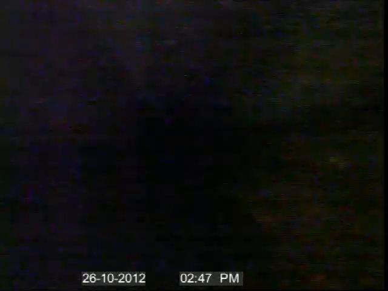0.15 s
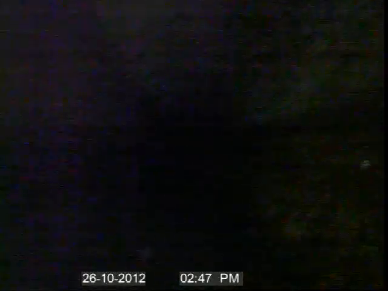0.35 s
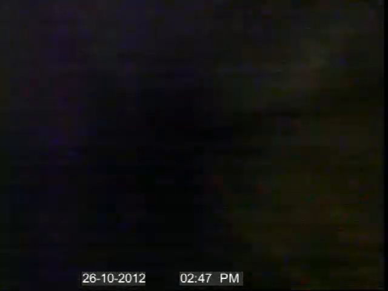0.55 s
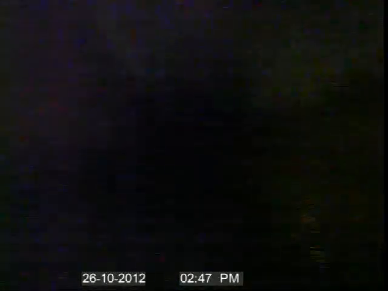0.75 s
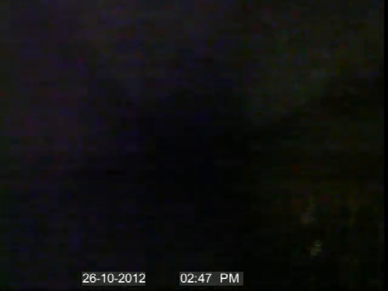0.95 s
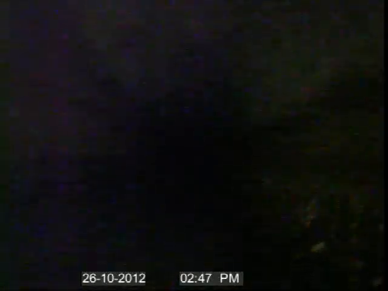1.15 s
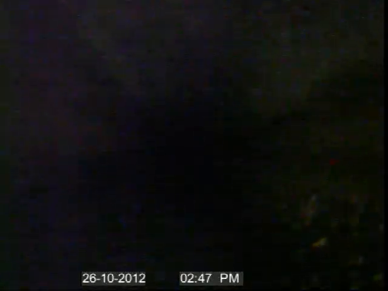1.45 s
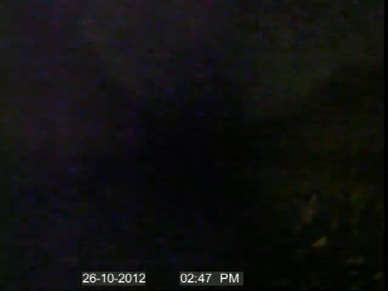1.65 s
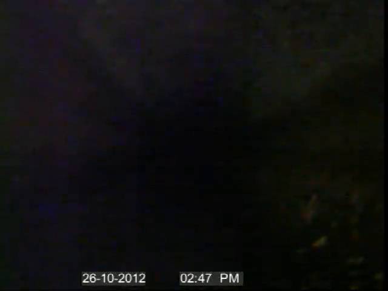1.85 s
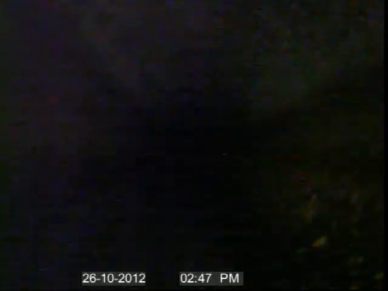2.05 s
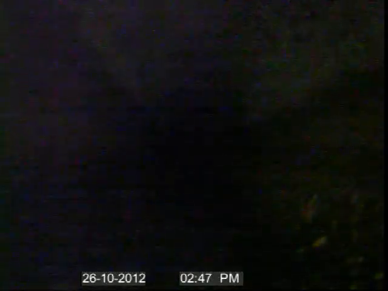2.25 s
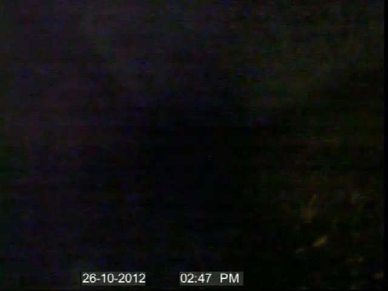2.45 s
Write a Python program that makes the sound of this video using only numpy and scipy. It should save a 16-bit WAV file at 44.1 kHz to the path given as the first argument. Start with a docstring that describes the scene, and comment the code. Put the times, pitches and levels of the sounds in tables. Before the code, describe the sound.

Juddering scrape of an inspection camera pushed along a drain, settling before two metallic clacks.

```python
"""Inside a drain pipe: an inspection camera is pushed along, then coasts to rest. Stick-slip makes its
cable judder and scrape, friction adds a rasp, and the peaks overload the microphone. The camera head
knocks and bumps with a short ring. A faint wavering drone stays, with hum, whine and light rubbing.
The cable shifts in small scuffs, and a metal part is struck twice: a crack, a thud, ringing modes."""
import sys
import numpy as np
from scipy import signal
from scipy.fft import rfft, irfft
from scipy.io import wavfile

SR = 44100
rng = np.random.default_rng(int(sys.argv[2]) if len(sys.argv) > 2 else 0)


def persist_wave(psi):
    """Save psi, clipped to +-1, as 16-bit WAV."""
    counts = np.round(np.clip(psi, -1, 1) * 32767).astype(np.int16)
    wavfile.write(sys.argv[1], SR, np.atleast_2d(counts).T)


N = 114660

# High resonances excited by rubbing: centre_hz, width_hz, pushed_db, rest_db
RUB_RESONANCES = [(1607, 73, -8, -64), (2937, 180, -4.5, -75), (3974, 230, -0.5, -78.5),
                  (4680, 190, -10, -80)]
# Low noise band of the scuffs and hum: freq_hz, gain_db
LOW_BAND = [(60, -17), (200, 9), (450, 4.5), (700, -15), (1100, -15), (2000, -74)]


def amp(db):
    """Decibels to gain."""
    return 10 ** (np.asarray(db) / 20)


def unit(x):
    """Scale to rms 1."""
    return x / np.sqrt(np.mean(x ** 2) + 1e-20)


def add(mix, start_s, sound):
    """Mix a sound in at start_s."""
    part = mix[max(round(start_s * SR), 0):][:len(sound)]
    part += sound[:len(part)]


def colour(x, spectrum):
    """Filter by (freq_hz, gain_db) points; rms 1."""
    hz, db = np.transpose(spectrum)
    gain_db = np.interp(np.log(np.fft.rfftfreq(N, 1 / SR) + 1), np.log(hz), db)
    return unit(irfft(rfft(x) * amp(gain_db), N))


def noise(spectrum):
    """Coloured noise; rms 1."""
    return colour(rng.standard_normal(N), spectrum)


def drift(rate_hz):
    """Low-passed random motion; rms 1."""
    lowpass = np.exp(-(np.fft.rfftfreq(N, 1 / SR) / rate_hz) ** 2)
    return unit(irfft(rfft(rng.standard_normal(N)) * lowpass, N))


def resonate(x, hz, width_hz):
    """Two-pole resonance; rms 1."""
    r = np.exp(-np.pi * width_hz / SR)
    return unit(signal.lfilter([1, 0, -1], [1, -2 * r * np.cos(2 * np.pi * hz / SR), r * r], x))


def push_level_db(curve, stop_s=0.891, fall_db_per_s=100):
    """Per-sample level of a (time_s, level_db) curve, dying away as the cable stops."""
    t = np.arange(N) / SR
    return np.interp(t, *np.transpose(curve)) - fall_db_per_s * np.maximum(t - stop_s, 0)


def slips(rate_per_s=700, spread_db=2):
    """Stick-slip: small random jerks of uneven size."""
    size = amp(spread_db * np.minimum(rng.exponential(1, N), 3))
    return unit(size * rng.choice([-1, 1], N) * (rng.random(N) < rate_per_s / SR))


def friction_band(hz, width_hz, wander_hz=35.47):
    """Rubbed resonance: a noise band with a wandering centre."""
    phase = 2 * np.pi * np.cumsum(hz + wander_hz * drift(rate_hz=13.58)) / SR
    return drift(width_hz) * np.cos(phase) + drift(width_hz) * np.sin(phase)


def cable_judder(full_push_db=-14):
    """Slips shake cable and pipe: judder, ringing and midrange scrape over a low rumble."""
    # Spectra of the pushed cable: freq_hz, gain_db
    body_spectrum = [(60, -11.5), (130, 3.5), (220, -2), (300, -4.5), (420, -2.5), (520, -19), (800, -58),
                     (1200, -54.5), (2400, -62)]
    rumble_spectrum = [(15, -17), (25, -20.5), (70, 6.5), (108, -7), (180, -22.5), (230, -53), (400, -120)]
    scrape_spectrum = [(350, -10.5), (520, -8), (680, 5.5), (820, 0), (1000, -3.5), (1250, -13.5),
                       (1650, -21), (2400, -21.5), (4000, -55)]
    # Envelopes of the push: time_s, level_db
    judder_curve = [(0.0, -22), (0.038, -14), (0.09, -22), (0.136, -16), (0.246, -19.5), (0.264, -15),
                    (0.42, -20), (0.456, -17), (0.506, -21.5), (0.528, -36), (0.556, -21.5), (0.67, -24.5),
                    (0.986, -43.5), (1.0, -47)]
    rumble_curve = [(0.0, -23), (0.044, -17), (0.076, -17), (0.15, -26.5), (0.246, -17.5), (0.278, -27),
                    (0.31, -17), (0.362, -26.5), (0.42, -13.5), (0.458, -20.5), (0.484, -25), (0.506, -24),
                    (0.59, -19.5), (0.688, -24), (0.704, -23.5), (1.0, -40.5)]
    scrape_curve = [(0, -42), (.12, -43.5), (.3, -37), (.4, -39.5), (.52, -39.5), (.58, -46), (.7, -47.5),
                    (.8, -50), (.9, -51), (.97, -58)]
    # Cable resonances in the pipe: centre_hz, width_hz, max_level_db, slope_db_per_judder_db
    cable_modes = [(206, 17, -18, 3), (256.5, 8.5, -17.5, 1.02), (392.5, 40, -26, 0.8)]
    jerks = slips()
    body = colour(jerks, body_spectrum)
    judder_db = push_level_db(judder_curve)
    judder = amp(judder_db - 4.5) * body
    boom = amp(-4.5) * resonate(body, hz=74.7, width_hz=7.9)
    rumble = amp(push_level_db(rumble_curve)) * (amp(1) * noise(rumble_spectrum) + boom)
    easing_db = np.minimum(judder_db - full_push_db, 0)
    ring = sum(amp(db + slope * easing_db) * resonate(body, hz, width_hz)
               for hz, width_hz, db, slope in cable_modes)
    scrape = amp(push_level_db(scrape_curve)) * colour(jerks, scrape_spectrum)
    return rumble + judder + ring + scrape


def cable_rasp(flicker_db=2.15):
    """Friction of the moving cable: flickering bright noise and rubbed resonances."""
    # Friction noise: freq_hz, gain_db
    rasp_spectrum = [(600, -10), (1600, 1), (2300, -4), (3000, -8), (3500, -5), (4100, -1), (5000, -8.5),
                     (7000, -13.5), (11000, -22)]
    # Rasp envelope: time_s, level_db
    rasp_curve = [(0, -54.5), (.1, -51.5), (.2, -48), (.4, -51), (.55, -55.5), (.7, -60.5), (.85, -75),
                  (1, -86)]
    grit = amp(1.5) * noise(rasp_spectrum)
    bands = sum(amp(db) * friction_band(hz, width_hz) for hz, width_hz, db, _ in RUB_RESONANCES)
    return amp(push_level_db(rasp_curve) + flicker_db * drift(rate_hz=37)) * (grit + bands)


def drone(waver_db=1.3):
    """Low gliding tone, wavering in pitch and level."""
    # Drone path: time_s, pitch_hz, level_db
    path = [(.85, 121.3, -50), (1.0, 121.7, -42), (1.241, 124.3, -38.5), (1.29, 112.1, -55),
            (1.501, 97.6, -48.5), (1.658, 98.5, -44.5), (1.79, 118.7, -43), (1.9, 101.5, -52),
            (2.15, 100.4, -46), (2.6, 105, -97)]
    t = np.arange(N) / SR
    time_s, hz, db = np.transpose(path)
    pitch_hz = np.interp(t, time_s, hz) * (1 + 0.0125 * drift(rate_hz=19.5))
    level_db = np.interp(t, time_s, db) + waver_db * drift(rate_hz=15)
    return np.sqrt(2) * amp(level_db) * np.sin(2 * np.pi * np.cumsum(pitch_hz) / SR)


def light_rubbing(fade_start_s=1.8, fall_db_per_s=20):
    """Faint friction on the high resonances, fading late."""
    t = np.arange(N) / SR
    bands = sum(amp(db) * friction_band(hz, width_hz) for hz, width_hz, _, db in RUB_RESONANCES)
    return bands * amp(-fall_db_per_s * np.maximum(t - fade_start_s, 0))


def background():
    """Steady whine, narrow-band noise hum, and a floor of rumble and hiss."""
    # Whine partials and hum resonances: pitch_hz, level_db
    whine_partials = [(2046, -72), (3070, -74), (4093, -74.5)]
    hum_modes = [(260, -60), (311, -55), (352, -64.5)]
    # Noise floor: freq_hz, gain_db
    floor_spectrum = [(20, 0), (40, 2.5), (70, -1), (110, -7.5), (170, -17.5), (300, -27.5), (450, -26.5),
                      (700, -32), (1300, -35), (1900, -37.5), (3400, -41), (5000, -43.5), (9500, -40),
                      (11000, -47)]
    t = np.arange(N) / SR
    whine = np.sqrt(2) * sum(amp(db) * np.sin(2 * np.pi * hz * t) for hz, db in whine_partials)
    hum = sum(amp(db) * resonate(noise(LOW_BAND), hz, width_hz=7.9) for hz, db in hum_modes)
    floor = noise(floor_spectrum) * amp(-38 + 0.8 * drift(rate_hz=60))
    return whine + hum + floor


def head_blow(t, push_db, push_hz, ring_db, ring_rise_s=0.0046):
    """Dull push and rebound, with a short ring of the camera head."""
    # Camera head modes: freq_hz, gain_db, t60_s
    head_modes = [(265.8, -2.5, 0.48), (297.3, 2, 0.047), (349.5, 1.5, 0.15), (389, -23, 0.21)]
    cycles = push_hz * t
    push = -2 * np.sin(2 * np.pi * cycles) * np.exp(-1.6 * cycles) * (1 - np.exp(-4 * cycles))
    ring = sum(amp(db - 60 * t / t60_s) * np.sin(2 * np.pi * hz * t) for hz, db, t60_s in head_modes) / 2
    return amp(push_db) * push + amp(ring_db) * ring * np.minimum(t / ring_rise_s, 1)


def knocks(tick_t60_s=0.045):
    """The head hits the pipe wall: hard knocks add a tick, soft bumps do not."""
    # Hard knocks: start_s, push_db, push_hz, ring_db, tick_db
    hard_knocks = [(0.0256, -12, 746, -10, -31), (.131, -12, 500, -20, -48), (.300, -26, 612, -10, -42),
                   (1.524, -22.5, 388, -49, -50), (1.816, -25.5, 296, -39, -31),
                   (1.835, -20.5, 295, -34, -48)]
    # Soft bumps: start_s, push_db, push_hz, ring_db
    soft_bumps = [(1.855, -27.5, 385, -27), (1.928, -25, 49.5, -62), (2.0126, -9.5, 205, -26.5),
                  (2.022, -14, 75, -36), (2.035, -22.5, 68.3, -40)]
    # Contact tick: freq_hz, gain_db
    tick_spectrum = [(400, 0), (850, 2.5), (1200, 9), (1750, -7), (2200, -19), (4000, -22), (6000, -48)]
    out, t = np.zeros(N), np.arange(SR // 4) / SR
    for start_s, push_db, push_hz, ring_db, tick_db in hard_knocks:
        tick = noise(tick_spectrum)[:len(t)] * amp(tick_db - 60 * t / tick_t60_s)
        add(out, start_s, head_blow(t, push_db, push_hz, ring_db) + tick)
    for start_s, push_db, push_hz, ring_db in soft_bumps:
        add(out, start_s, head_blow(t, push_db, push_hz, ring_db))
    return out


def scuffs(grit_db=2.94):
    """The cable shifts: short gritty rubs that swell and fade."""
    # Cable scuffs: start_s, length_s, low_db, mid_db, high_db
    shifts = [(1.323, .03, -47, -58, -63.5), (1.422, 0.018, -47, -55, -49), (1.488, 0.033, -37, -52.5, -62),
              (1.645, 0.044, -38.5, -52.5, -59), (1.73, 0.021, -46, -56, -77),
              (1.816, 0.034, -44, -46, -50), (2.211, 0.0069, -66, -52, -53.5),
              (2.506, 0.039, -62, -61, -61), (2.540, 0.0067, -48, -48.5, -50)]
    # Upper scuff bands: freq_hz, gain_db
    mid_band = [(400, -18), (900, 8.5), (1400, -0.5), (2000, 12), (3000, 4.5), (5000, -60)]
    high_band = [(1500, -22), (3000, -3), (4100, 9.5), (5000, -4.5), (10000, 1.5), (12000, -12)]
    out = np.zeros(N)
    for start_s, length_s, *levels_db in shifts:
        progress = np.arange(0, 2, 1 / (SR * length_s))
        envelope = np.minimum(progress / 0.29, 1) * np.exp(-progress ** 4)
        rub = sum(amp(db) * noise(band) for db, band in zip(levels_db, (LOW_BAND, mid_band, high_band)))
        rub *= amp(grit_db * drift(rate_hz=134))
        add(out, start_s, rub[:len(envelope)] * envelope)
    return out


def treble_lift_db(hz, shelf_db, corner_hz=8700):
    """High-shelf gain at hz."""
    return shelf_db / (1 + (corner_hz / hz) ** 10)


def clacks(crack_t60_s=0.045, tail_t60_s=0.21, tail_db=-16.5, thud_hz=82, thud_t60_s=0.15):
    """Metal strikes metal: dense crack, thud and beating modes."""
    # Strikes: start_s, rise_s, ring_db, crack_db, shelf_db
    strikes = [(2.0618, .005, -28.5, -19.5, 10), (2.3922, .0008, -20.5, -11, 0)]
    # Modes of the metal part: freq_hz, gain_db, t60_s
    metal_modes = [(980, -10, .19), (1152, -1.5, .18), (1517, -3, .06), (1728, -11, .17), (1988, 1.5, .05),
                   (2304, -19, .2), (2782, -11, .16), (2893, -7, .13), (3537, -20, .22), (3860, -7, .095),
                   (4630, -5, .05), (5114, 2, .12), (5233, 6, .095), (5545, -3, .09), (6285, 2, .045),
                   (6526, -1.5, .095), (6855, -1, .08), (7690, -5, .08), (8123, -16, .15), (8990, -1, .065),
                   (9497, -5, .11), (9700, -7, .058), (10830, -15, .07)]
    # Impact noise: freq_hz, gain_db
    crack_spectrum = [(100, -4), (540, 3), (900, 2), (1200, 5), (2000, 6), (2500, -9), (4000, 2),
                      (5200, -5), (6500, 1.5), (8000, -2), (9500, 0), (11000, -10)]
    out, t = np.zeros(N), np.arange(SR // 3) / SR
    thud = np.sin(2 * np.pi * thud_hz * t) * amp(-27 - 60 * t / thud_t60_s)
    tail = amp(tail_db - 60 * t / tail_t60_s)
    for start_s, rise_s, ring_db, crack_db, shelf_db in strikes:
        ring = sum(amp(db + treble_lift_db(hz, shelf_db) - 60 * t / t60_s)
                   * np.sin(2 * np.pi * (hz * t + rng.random())) for hz, db, t60_s in metal_modes)
        lifted_spectrum = [(hz, db + treble_lift_db(hz, shelf_db)) for hz, db in crack_spectrum]
        burst = amp(-60 * np.maximum(t - rise_s, 0) / crack_t60_s)
        crack = noise(lifted_spectrum)[:len(t)] * (burst + tail)
        attack = np.minimum(t / rise_s, 1)
        add(out, start_s, attack * (amp(ring_db) * ring + amp(crack_db) * crack + thud))
    return out


def scene():
    """All sources at one microphone."""
    push = cable_judder() + cable_rasp()
    bed = drone() + light_rubbing() + background()
    return (push + bed + scuffs() + knocks() + clacks())[None]


def record(dry):
    """Microphone overload on loud peaks, then a low-pass."""
    ceiling, knee, cutoff_hz = 0.268, 12, 11650
    clipped = dry / (1 + abs(dry / ceiling) ** knee) ** (1 / knee)
    lowpass = signal.firwin(151, cutoff_hz, window=("kaiser", 9), fs=SR)
    return signal.oaconvolve(clipped, lowpass[None], "same")


dry = scene()
out = record(dry)
persist_wave(out)
```